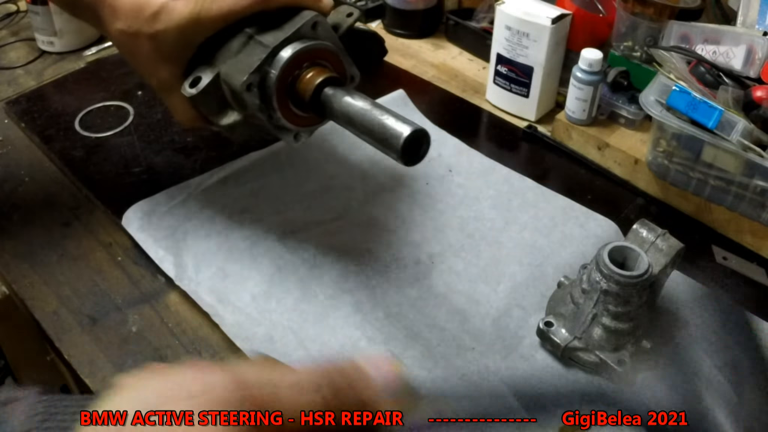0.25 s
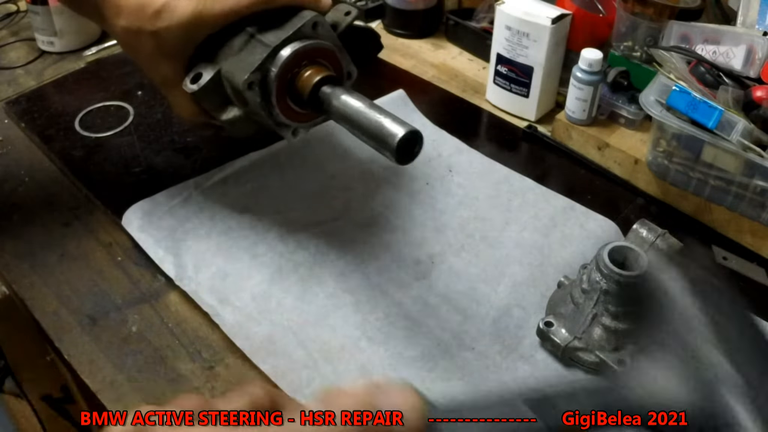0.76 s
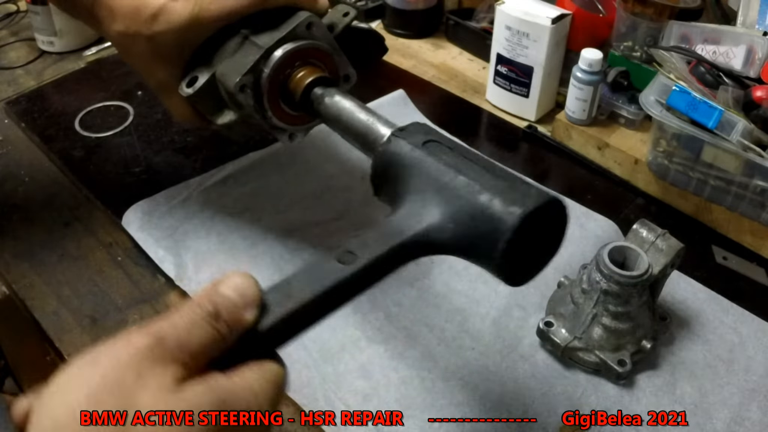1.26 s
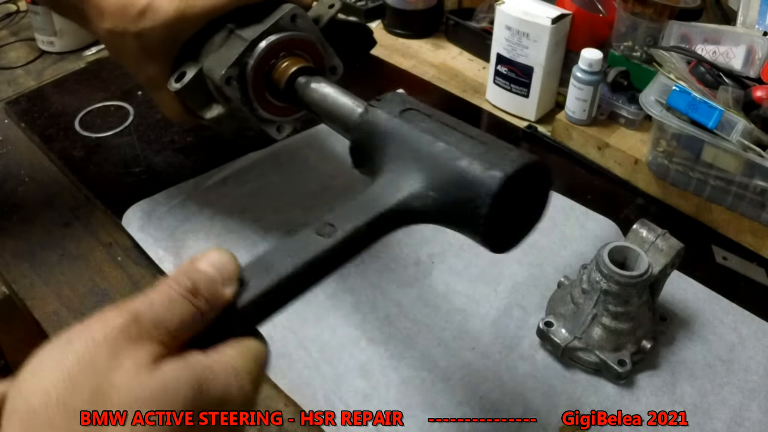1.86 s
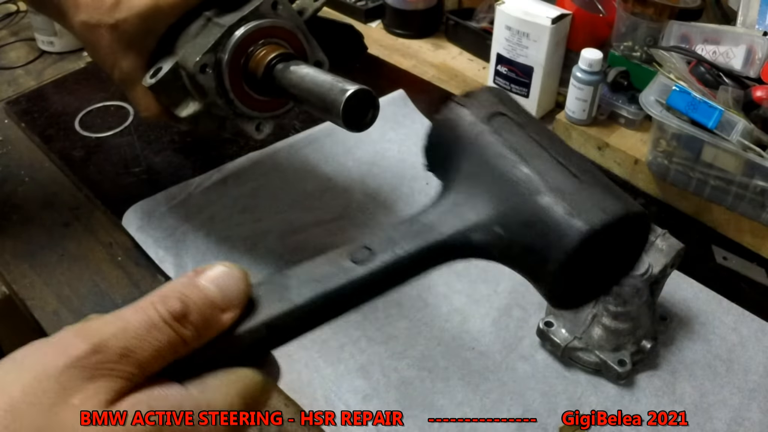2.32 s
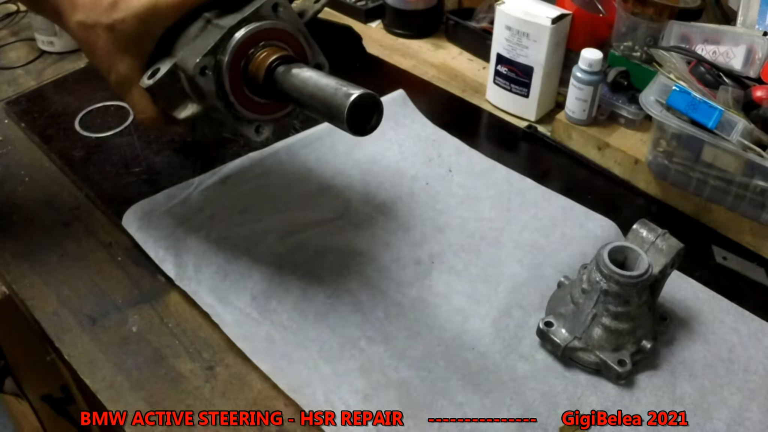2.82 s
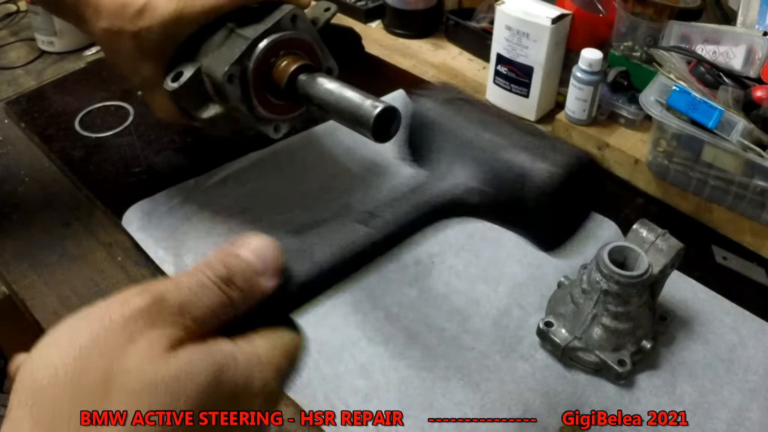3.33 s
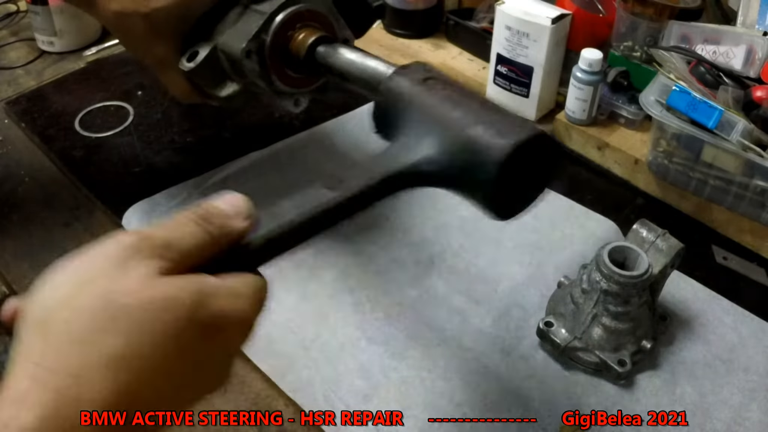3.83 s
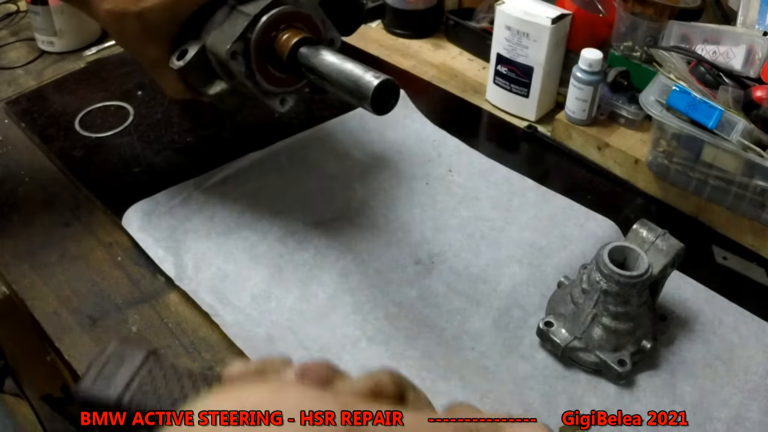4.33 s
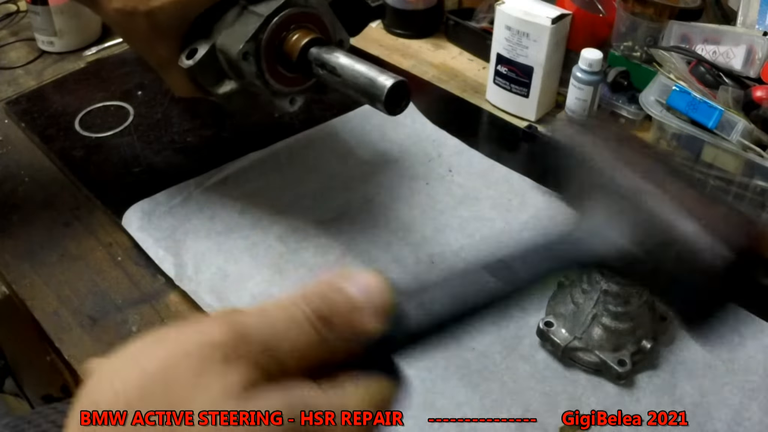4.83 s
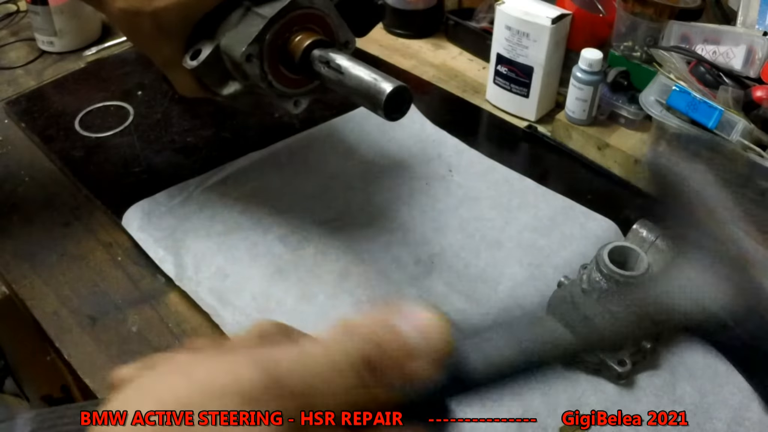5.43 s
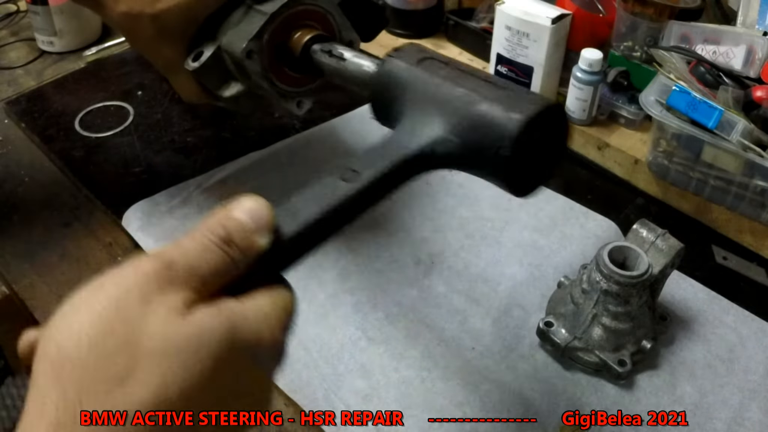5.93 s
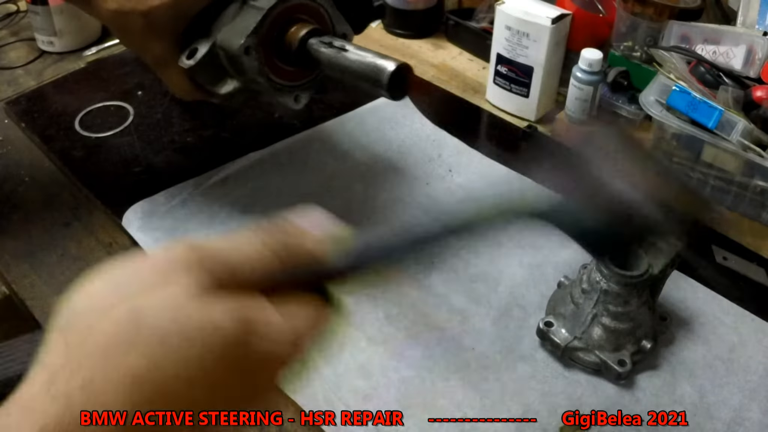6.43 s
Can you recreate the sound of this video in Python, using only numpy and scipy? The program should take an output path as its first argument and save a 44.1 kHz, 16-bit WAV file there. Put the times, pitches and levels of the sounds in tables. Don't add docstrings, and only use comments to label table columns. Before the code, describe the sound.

It opens on faint workshop hiss, low rumble and the dying echo of an earlier, softer blow. At 0.06 s a rubber mallet lands on a steel shaft in a hollow aluminium housing: a loud dull knock, mid-low and woody, with a small steel crack and a faint brief ring. Similar blows follow about every 0.3 s, at 0.36, 0.67, 0.97, 1.27, 1.56 and 1.86. Just before each, loose shot slides in the head with a soft gritty swish; after each, bench and room echo for a fraction of a second. From about 2.2 to 2.9 s there is no blow and the gain lifts the room noise markedly. It ducks just before a more resonant knock at 2.99, then even tapping continues, slightly varied in brightness, through 6.52 s, whose echo ends the scene. Close, mono, small-camera sound with hard-limited peaks.

```python
import sys
import numpy as np
from scipy import signal
from scipy.fft import rfft, irfft
from scipy.io import wavfile
from scipy.ndimage import uniform_filter1d, map_coordinates

SR = 44100
rng = np.random.default_rng(int(sys.argv[2]) if len(sys.argv) > 2 else 0)


def wrap_up_sound(samples):
    columns = np.atleast_2d(samples).T
    tamed = np.clip(columns, -1, 1)
    steps = np.round(tamed * 32767).astype(np.int16)
    wavfile.write(sys.argv[1], SR, steps)


def nominal_scale(level):
    x = np.asarray(level, float) / 20
    return 10 ** x


N = 293868
SPAN = SR // 2

# pitch_hz, density_db_per_hz
RUMBLE_SPECTRUM = [(15, -23.5), (30, 1), (75, 0), (140, -9), (300, -26), (600, -70.5)]
HISS_SPECTRUM = [(60, -31.5), (150, -3), (300, -4.5), (600, -10), (1300, -15.5), (3000, -21.5),
                 (7000, -30.5), (12500, -39), (13500, -47), (16000, -54)]
# pitch_hz, density_db_per_hz
SHOT_SPECTRUM = [(400, -19.5), (900, -1), (1900, -0.5), (3400, -6.5), (7200, -9.5), (11000, -20),
                 (15000, -31)]
# start_s, sharp_knock_db, bite_db, metal_crack_db
BLOWS = [(0.0575, 1.3, 2.1, -32.5), (0.3627, -0.1, 1, -37), (0.6662, 0.1, -0.5, -35.5),
         (0.9688, 0.5, -1.5, -31.4), (1.2675, -0.2, -2.5, -32.5), (1.5624, 0.5, -1.3, -29),
         (1.8634, -0.5, 3.6, -33), (2.9933, 0, 10.2, -32), (3.3019, 1.2, 0.5, -30), (3.5985, 1, -12, -38.5),
         (3.8866, 0.8, -12.5, -28.5), (4.1799, 0.2, -6.5, -35.5), (4.4733, 0, 4, -33.5),
         (4.7643, 0.5, -4, -34), (5.055, 0.1, -6, -34), (5.3468, -1.5, -3, -35.5), (5.6357, 1, -11, -32),
         (5.9299, 0, -1, -37.5), (6.2207, 0.1, -1, -38.5), (6.5152, 0.7, -4.9, -34)]
EARLIER_BLOW = (-0.1043, -3, 0, -40.5)
# pitch_hz, width_hz, level_db,
# side (+1 moving towards the microphone, -1 away)
HOLLOW_MODES = [(389, 540, 15.31, 1), (420, 638, 15.58, -1), (533, 92, 13.2, 1), (769, 63, 11.4, 1),
                (864, 47, 17.4, -1)]
SHARP_MODES = [(1562, 305, 21, -1)]
BITE_MODES = [(2174, 55, 12.1, -1)]
# pitch_hz, density_db_per_hz
CRACK_SPECTRUM = [(1410, -28.5), (2400, 0), (4230, -5.5), (4820, -17.5), (5450, -6), (7180, -13.5),
                  (10500, -21), (15000, -62.5)]
# pitch_hz, level_db, t60_s
SHAFT_PARTIALS = [(3350, -8, 0.27), (4170, -2.5, 0.33), (4420, -4.5, 0.41), (5540, -10, .2),
                  (7100, -6, 0.28)]
# pitch_hz, density_db_per_hz
BENCH_SPECTRUM = [(120, -42.5), (310, -19.5), (420, -20), (510, -4.5), (700, -8), (850, -10.5),
                  (1020, -6.5), (1220, -12.5), (1550, -11.5), (2200, -15), (2900, -28.5), (4300, -24),
                  (9000, -41.5), (14000, -61.5)]
ROOM_SPECTRUM = [(150, -47), (310, -18), (420, -21), (510, -8.5), (690, -9.5), (830, 2), (1020, -4),
                 (1230, -18), (1600, -12), (2050, -19.5), (3000, -32), (4400, -31), (9000, -41.5),
                 (14000, -67)]
# pitch_hz, t60_s
BENCH_T60 = [(150, 0.23), (600, 0.21), (2000, 0.097), (5000, 0.088), (12000, 0.15)]
ROOM_T60 = [(250, 0.17), (520, 0.63), (850, 0.38), (1800, 0.49), (5000, 0.47), (8000, 0.44), (12000, .4)]
# pitch_hz, share_0_to_1
REPEATS = [(300, .95), (2000, .85), (5000, .4), (10000, .1)]
# pitch_hz, level_db
CAPSULE = [(10000, -0.5), (13500, -4), (15500, -8), (16200, -50)]

SHOT_DB, SHOT_SCATTER_DB = -64, -1.75
SHOT_LEAD_S = 0.058
USUAL_CRACK_DB, FORCE_PER_CRACK, FORCE_PER_SHARP = -33.7, 0.07, -0.35
EARLIER_DB = -17
RING_SCATTER_DB = 2.5
RECOVER_DB, RECOVER_S, HOLD_S = 5.5, 0.15, 0.32
CLIMB_DB_PER_S, CLIMB_TOP_DB = 19.5, 13.5


def unit(x):
    return x / np.sqrt(np.mean(x ** 2) + 1e-20)


def along(points, hz):
    f, v = np.transpose(points)
    return np.interp(np.log(hz + 1), np.log(f + 1), v)


def coloured(x, spectrum):
    hz = np.fft.rfftfreq(x.shape[-1], 1 / SR)
    return unit(irfft(rfft(x) * nominal_scale(along(spectrum, hz)), x.shape[-1]))


def add(track, s, sound):
    track[round((s + 1) * SR):][:len(sound)] += sound


def air():
    lumps_per_s = 22
    knots = rng.standard_normal(int(N * lumps_per_s / SR) + 4)
    lumps = map_coordinates(knots, [np.arange(N) * lumps_per_s / SR])
    rumble = nominal_scale(-74.5 + 1.5 * lumps) * coloured(rng.standard_normal(N), RUMBLE_SPECTRUM)
    return rumble + nominal_scale(-73.5) * coloured(rng.standard_normal(N), HISS_SPECTRUM)


def shot():
    swell = np.zeros(N + 2 * SR)
    t = np.arange(SR // 5) / SR - 0.1
    shape = np.exp(np.minimum(t, 0) / 0.025) * np.exp(-np.maximum(t, 0) / 0.014)
    for s, *_ in BLOWS:
        level_db = SHOT_DB + SHOT_SCATTER_DB * rng.standard_normal()
        add(swell, s - 0.1 - SHOT_LEAD_S, nominal_scale(level_db) * shape)
    clicks = rng.standard_normal(N) * nominal_scale(1.3 * rng.exponential(size=N))
    return uniform_filter1d(swell[SR:][:N], 200) * coloured(clicks, SHOT_SPECTRUM)


def force_db(s, sharp_db, crack_db):
    from_crack = FORCE_PER_CRACK * (crack_db - USUAL_CRACK_DB)
    return from_crack + FORCE_PER_SHARP * sharp_db + EARLIER_DB * (s < 0)


def modes(rows, f):
    total = 0
    for centre, width, db, side in rows:
        damping = 1j * f * width
        total = total + side * nominal_scale(db) * damping / (centre * centre - f * f + damping)
    return total


def knock(sharp_db, bite_db):
    f = np.fft.rfftfreq(SPAN, 1 / SR)
    body = modes(HOLLOW_MODES, f) + nominal_scale(sharp_db) * modes(SHARP_MODES, f) + nominal_scale(bite_db) * modes(BITE_MODES, f)
    push = 1 / (1 + 1j * f / 603) ** 3
    bass_cut = (1j * f / (50 + 1j * f)) ** 3
    return nominal_scale(30.0) * irfft(body * push * bass_cut, SPAN)


def crack(t):
    snap = nominal_scale(-60 * t / 0.0087) + nominal_scale(-7 - 60 * t / 0.037)
    return coloured(rng.standard_normal(SPAN), CRACK_SPECTRUM) * snap * (1 - np.exp(-t / 0.00027))


def blurred(hz, t, width_hz):
    knots = rng.standard_normal((2, SPAN // 40))
    slow = [map_coordinates(k, [t * width_hz]) for k in knots]
    return slow[0] * np.sin(2 * np.pi * hz * t) + slow[1] * np.cos(2 * np.pi * hz * t)


def ring(t):
    total = np.zeros(SPAN)
    for hz, level, t60 in SHAFT_PARTIALS:
        level_db = level + RING_SCATTER_DB * rng.standard_normal()
        total += nominal_scale(level_db - 60 * t / t60) * blurred(hz, t, width_hz=230)
    return total * (1 - np.exp(-t / 0.0013))


def bright(spectrum, crack_db):
    return [(hz, level + 0.5 * (crack_db + 33.5) * (hz > 2500)) for hz, level in spectrum]


def echo(common, spectrum, t60s, rise):
    noises = np.array([common, rng.standard_normal(SPAN)])
    hz, t, z = signal.stft(coloured(noises, spectrum), SR, nperseg=256)
    share = along(REPEATS, hz)[:, None]
    decay = nominal_scale(-60 * t / along(t60s, hz)[:, None])
    z = (np.sqrt(share) * z[0] + np.sqrt(1 - share) * z[1]) * decay
    build_up = 1 - np.exp(-(np.arange(SPAN) / SR / rise) ** 2)
    return signal.istft(z, SR, nperseg=256)[1][:SPAN] * build_up


def mallet():
    track, t = np.zeros(N + 2 * SR), np.arange(SPAN) / SR
    near, far = rng.standard_normal((2, SPAN))
    for s, sharp_db, bite_db, crack_db in [EARLIER_BLOW] + list(BLOWS):
        metal = nominal_scale(crack_db + 8.5) * crack(t) + nominal_scale(0.5 * crack_db - 38) * ring(t)
        bench = nominal_scale(-24.0) * echo(near, bright(BENCH_SPECTRUM, crack_db), BENCH_T60, rise=0.0011)
        room = nominal_scale(-34.5) * echo(far, bright(ROOM_SPECTRUM, crack_db), ROOM_T60, rise=0.0022)
        blow = knock(sharp_db, bite_db) + metal + bench + room
        add(track, s, nominal_scale(force_db(s, sharp_db, crack_db)) * blow)
    return track[SR:][:N]


def scene():
    return (mallet() + shot() + air())[None]


def top_cut(x):
    return signal.sosfilt(signal.butter(12, 15880, fs=SR, output="sos"), x)


def record(dry):
    t = np.arange(N) / SR
    loud = np.roll(np.abs(dry[0]) > 0.3, -round(0.012 * SR))
    since = t - np.maximum.accumulate(np.where(loud, t, EARLIER_BLOW[0]))
    recovery_db = RECOVER_DB * (1 - np.exp(-since / RECOVER_S))
    climb_db = np.clip(CLIMB_DB_PER_S * (since - HOLD_S), 0, CLIMB_TOP_DB)
    x = dry * nominal_scale(uniform_filter1d(recovery_db + climb_db, size=40))
    x = x / (1 + np.abs(x / 1.01) ** 12) ** (1 / 12)
    x = irfft(rfft(x) * nominal_scale(along(CAPSULE, np.fft.rfftfreq(N, 1 / SR))), N)
    return top_cut(x)


dry = scene()
out = record(dry)
wrap_up_sound(out)
```